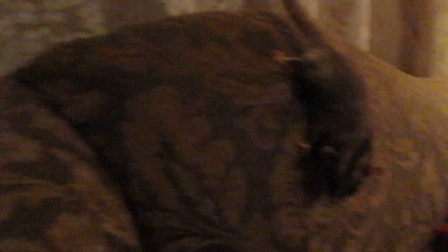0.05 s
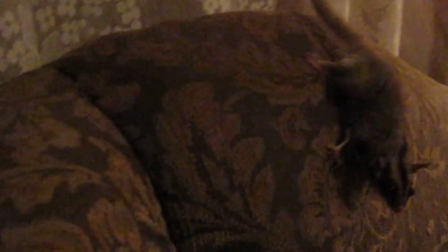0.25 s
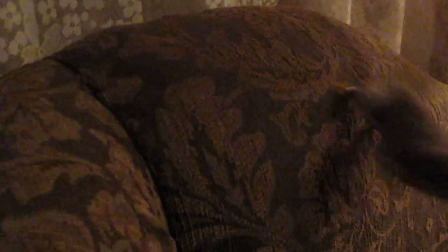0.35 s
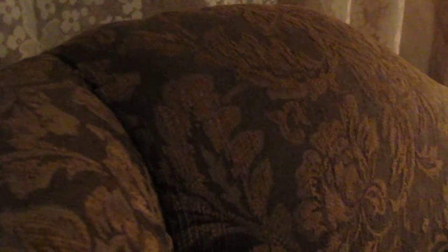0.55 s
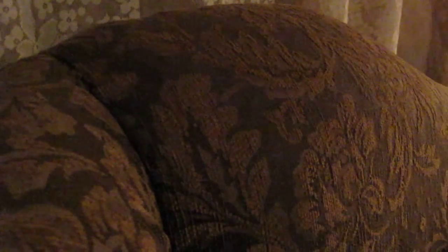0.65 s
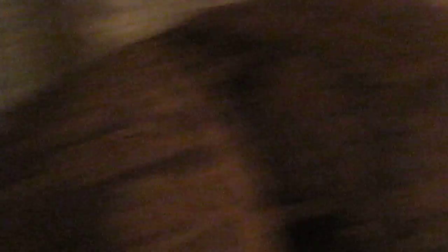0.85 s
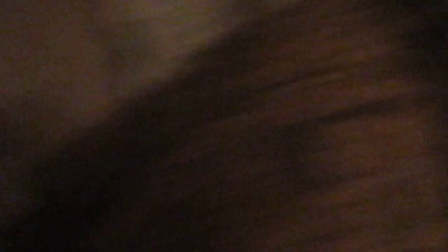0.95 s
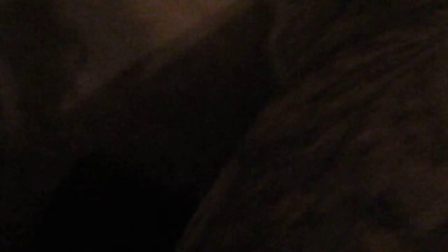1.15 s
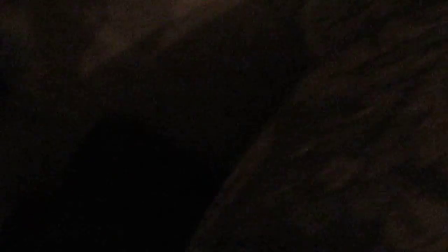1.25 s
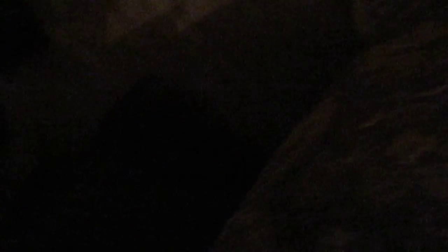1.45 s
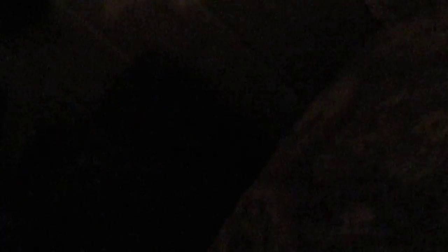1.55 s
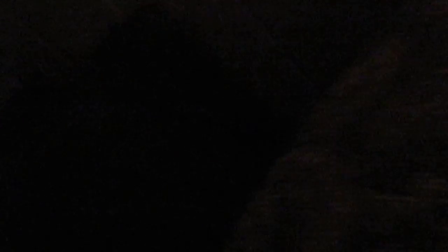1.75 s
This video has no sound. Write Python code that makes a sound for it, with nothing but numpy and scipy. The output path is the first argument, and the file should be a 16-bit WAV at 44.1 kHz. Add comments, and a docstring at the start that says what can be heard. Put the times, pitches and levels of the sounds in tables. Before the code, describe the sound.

Small claws scrabble close by on an upholstered armchair, rasping and ticking as threads snap free, growing louder until the animal leaps at about 0.75 seconds. A few soft thumps follow from 0.85 to 1 second. Light cloth swishes and one tiny squeak come between 1.1 and 1.4 seconds, then a closer, brighter rustle from 1.5 seconds. Quiet room noise and a very faint motor whine lie underneath.

```python
"""A quiet room, a hand-held camera's microphone close to an upholstered armchair; a small motor whines.
First a sugar glider scrabbles over the chair, claws rasping across the weave and snapping free of threads.
At 0.74 s it leaps off, the padding springs back, and it lands with a few soft thumps.
Then cloth swishes and squeaks as the camera turns after it; from 1.5 s the rustle is close and bright."""
import sys
import numpy as np
from scipy import signal
from scipy.fft import rfft, irfft
from scipy.io import wavfile
from scipy.ndimage import uniform_filter1d

SR = 44100
rng = np.random.default_rng(int(sys.argv[2]) if len(sys.argv) > 2 else 0)


def file_out(sig):
    """Save sig as 16-bit WAV at sys.argv[1]."""
    # one column per channel
    cols = np.atleast_2d(sig).T
    # limit, then scale
    lim = np.clip(cols, -1, 1)
    pcm = np.round(lim * 32767).astype(np.int16)
    wavfile.write(sys.argv[1], SR, pcm)


N = 79380
T = np.arange(N) / SR


def amp(db):
    """Decibels to gain."""
    return 10 ** (np.asarray(db) / 20)


def unit_rms(x):
    """Scales to unit rms."""
    return x / np.sqrt(np.mean(x ** 2) + 1e-20)


def unit_energy(x):
    """Scales to unit energy."""
    return x / np.sqrt(np.sum(x ** 2) + 1e-20)


def curve_at(points, hz):
    """Reads a table on a log-frequency axis."""
    f, value = np.transpose(points)
    return np.interp(np.log(hz + 1), np.log(f + 1), value)


def add(mix, at_s, sound):
    """Adds a sound at the given time."""
    part = mix[max(round(at_s * SR), 0):][:len(sound)]
    part += sound[:len(part)]


def convolve(x, response):
    """Convolves, keeping the length."""
    return signal.fftconvolve(x, response)[:len(x)]


def colour(x, spectrum, size=4096):
    """Minimum-phase filter of unit energy: only the spectrum's shape counts."""
    log_gain = np.log(amp(curve_at(spectrum, abs(np.fft.fftfreq(size, 1 / SR)))))
    response = np.fft.ifft(np.exp(np.conj(signal.hilbert(log_gain)))).real
    return convolve(x, unit_energy(response[:size // 2]))


def lowpass(x, hz):
    """Gentle low-pass."""
    return signal.lfilter(*signal.butter(2, min(hz, SR / 2 - 1), fs=SR), x)


def swell(peak_s, rise_s, fall_s, db):
    """Pressure of one stroke: builds up, then lets go."""
    return amp(db) * np.exp(-np.where(T < peak_s, ((T - peak_s) / rise_s) ** 2 / 2, (T - peak_s) / fall_s))


def thread_slips(per_s=4200, spread_db=4.5):
    """Tiny clicks of uneven size, one for each thread that slips."""
    size = amp(spread_db * np.minimum(rng.exponential(1, N), 4))
    return unit_rms(size * rng.choice([-1, 1], N) * (rng.random(N) < per_s / SR))


# spectrum of the room tone: f/Hz, relative level/dB
ROOM_TONE = [(25,0.5),(37,-3.5),(55,-1.5),(85,-6),(120,4.5),(200,-7),(300,1),(520,-9.5),(830,-8),(1260,-10.5),(1900,-10.5),(3200,-11.5),(4300,-13),(7500,-14),(10100,-16.5),(16000,-31.5)]
# faint narrow peaks in the background, the one near 1.9 kHz part of the motor's whine: f/Hz, half-width/Hz,
# level/dB
BACKGROUND_PEAKS = [(1370,70,-71),(1897,49,-65.5),(7120,220,-68.5)]
def room_tone(level_db=-52.5):
    """The quiet room around the microphone: steady noise with a few narrow peaks."""
    f = np.fft.rfftfreq(N, 1 / SR)
    spectrum = rfft(rng.standard_normal(N)) * amp(curve_at(ROOM_TONE, f))
    out = amp(level_db) * unit_rms(irfft(spectrum, N))
    for hz, width, db in BACKGROUND_PEAKS:
        peak = rfft(rng.standard_normal(N)) / (1 + ((f - hz) / width) ** 2)
        out += amp(db) * unit_rms(irfft(peak, N))
    return out


def motor_whine(hz=1864, level_db=-64):
    """A small motor's faint, wavering tone."""
    waver_hz = 3 * unit_rms(lowpass(rng.standard_normal(N), 20.0))
    return np.sqrt(2) * amp(level_db) * np.sin(2 * np.pi * np.cumsum(hz + waver_hz) / SR)


# reverberation of the furnished room: f/Hz, T60/s
REVERB_TIMES = [(150,0.84),(1500,0.15),(5000,0.14),(14000,0.15)]
def in_room(direct, tail_db=-16.5, early_db=-16, early_s=0.0037, early_hz=3350, move_s=0.3078):
    """The microphone hears the direct sound, dull reflections off chair and wall, then a short tail."""
    t = T[:SR // 2]
    hz, frame_s, bands = signal.stft(rng.standard_normal(len(t)) * (t > .006), SR, nperseg=256)
    decay = amp(-60 * frame_s / curve_at(REVERB_TIMES, hz)[:, None])
    tail = signal.istft(bands * decay, SR, nperseg=256)[1]
    out = direct + amp(tail_db) * convolve(direct, unit_energy(tail))
    for k in range(3):  # three patterns of reflections take turns as the animal moves
        share = np.maximum(np.cos(2 * np.pi * (T / move_s - k / 3)), 0)
        early = rng.standard_normal(len(t)) * (t > .001) * np.exp(-t / early_s)
        out += amp(early_db) * convolve(direct * share, unit_energy(lowpass(early, early_hz)))
    return out


# loudness of the rustle as the camera turns: t/s, level/dB
RUSTLE_LEVELS = [(0,-54),(.7,-47.5),(.78,-45),(.84,-52),(1.04,-48.5),(1.17,-49.5),(1.28,-57),(1.37,-50),(1.44,-55),(1.54,-52),(1.62,-48.5),(1.7,-45.5),(1.76,-43),(1.8,-43.5)]
# spectrum of rustling cloth: f/Hz, relative level/dB
RUSTLE_SPECTRUM = [(60,-21),(200,-7),(370,0.5),(800,-4),(1300,2),(1650,-0.5),(2400,-2),(4800,-7.5),(7500,-9),(10500,-8.5),(13000,-17),(16000,-31)]
def cloth_rustle(muffled_hz=2000, near_s=1.505, approach_s=0.038):
    """Rubbing cloth, muffled at first and bright once it is close to the microphone."""
    bright = colour(unit_rms(thread_slips() + rng.standard_normal(N)), RUSTLE_SPECTRUM)
    muffled = unit_rms(lowpass(bright, muffled_hz))
    near = .5 + .5 * np.tanh((T - near_s) / approach_s)
    level = amp(np.interp(T, *np.transpose(RUSTLE_LEVELS)))
    return (near * bright + (1 - near) * muffled) * level


# spectrum of the squeak: f/Hz, relative level/dB
SQUEAK_SPECTRUM = [(100,-30),(2700,-8),(3200,-10),(3850,0),(4300,-25),(6000,-22),(16000,-52)]
def cloth_squeak():
    """One small squeak: a burst of noise with a sharp peak in the treble."""
    envelope = swell(peak_s=1.224, rise_s=.003, fall_s=0.012, db=-46.5)
    return colour(rng.standard_normal(N) * envelope, SQUEAK_SPECTRUM)


# swishes during the turn: peak t/s, rise/s, fall/s, level before the low-pass/dB, cutoff f/Hz
CLOTH_SWISHES = [(1.111,0.01,0.0033,-40,4000),(1.325,0.00018,0.0021,-38.5,13000),(1.343,0.0096,0.0094,-39.5,17500),(1.359,0.006,0.0057,-33,17000),(1.386,0.014,0.0084,-36.5,11900)]
# spectrum of sliding cloth: f/Hz, relative level/dB
SWISH_SPECTRUM = [(100,-31),(1000,-39),(2400,-16),(3400,-7.5),(4800,-11.5),(6300,-2.5),(8000,-0.5),(10500,-3),(13000,-7),(16000,-14)]
def cloth_swishes(roughness=0.24, flutter_hz=400):
    """Short bright swishes that flutter as the cloth catches and slides unevenly."""
    flutter = np.exp(roughness * unit_rms(lowpass(rng.standard_normal(N), flutter_hz)))
    sliding = unit_rms(colour(flutter * rng.standard_normal(N), SWISH_SPECTRUM))
    return sum(lowpass(sliding, top_hz) * swell(*stroke) for *stroke, top_hz in CLOTH_SWISHES)


# spectrum of the armchair's padding: f/Hz, relative level/dB
PADDING_SPECTRUM = [(30,-27),(70,-7),(120,2),(210,-2.5),(330,-3),(550,-4.5),(720,-8),(1200,-33),(4000,-43)]
def padding(claws, push_db=-17):
    """The padding gives dully under the claws and springs back after the leap."""
    push = amp(push_db) * np.sqrt(abs(uniform_filter1d(claws ** 2, 900)))
    spring_back = swell(peak_s=.742, rise_s=0.012, fall_s=0.019, db=-42)
    return colour((push + spring_back) * rng.standard_normal(N), PADDING_SPECTRUM)


# modes of the struck furniture: f/Hz at pitch ratio 1, relative level/dB, decay/s
FURNITURE_MODES = [(273,-6,0.017),(350,-8.5,0.005),(430,-15.5,0.0069)]
# landing and footfalls: t/s, level/dB, decay/s, cutoff f/Hz, pitch ratio, relative ring level/dB
FOOTFALLS = [(0.8629,-33,0.0048,2460,1.2,-2),(.878,-28.5,0.0037,700,1.18,7),(.892,-33.5,0.0079,500,1.02,12),(0.9113,-23,0.0035,560,.53,0),(.919,-32,0.0033,1500,1,-2),(0.9864,-16.5,0.00088,1100,1.4,-1),(1.017,-34.5,0.0071,1720,1.2,-2)]
def landing_thumps(low_hz=125, slope=2.1, rise_s=0.00075, push=0.69):
    """Soft blows: a low push, a scuff and a brief ring pitched by where the furniture is struck."""
    out, t, hz = np.zeros(N), T[:4096], np.geomspace(20, 20000, 40)
    for at_s, db, decay_s, top_hz, pitch, ring_db in FOOTFALLS:
        ring = sum(amp(mode_db) * unit_energy(np.sin(2 * np.pi * f * pitch * t) * np.exp(-t / fade_s))
                   for f, mode_db, fade_s in FURNITURE_MODES)
        band_db = -10 * np.log10((1 + (low_hz / hz) ** 6) * (1 + (hz / top_hz) ** 2) ** slope)
        envelope = (1 - np.exp(-t / rise_s)) * np.exp(-t / decay_s)
        scuff = unit_energy(envelope * rng.standard_normal(len(t)))
        blow = unit_energy(colour(scuff + push * (t == 0), np.c_[hz, band_db]))
        add(out, at_s, amp(db) * np.linalg.norm(envelope) * unit_energy(blow + amp(ring_db) * ring))
    return out


# claw strokes over the weave: peak t/s, rise/s, fall/s, level/dB
CLAW_STROKES = [(.144,0.032,0.0063,-43),(.2,0.042,0.027,-47.5),(0.247,0.02,0.011,-39),(.305,0.023,0.018,-38.5),(.366,0.02,0.021,-33.5),(0.397,0.0064,0.0085,-31),(0.421,0.0072,0.0027,-29),(0.467,0.011,0.032,-33),(0.54,0.0024,0.0032,-26),(0.572,0.0086,0.01,-27),(0.605,0.0099,0.0096,-23.5),(0.647,0.015,0.012,-24.5),(0.726,0.0077,0.021,-29)]
# spectrum of one thread slipping: f/Hz, relative level/dB
SLIP_SPECTRUM = [(50,-33),(130,-11),(420,-12),(570,-1),(770,-5),(1170,2.5),(1650,1.5),(2400,.5),(3100,-5),(3750,-0.5),(4800,-9.5),(7000,-10),(9700,-13),(12000,-21.5),(16000,-35)]
def claw_rasp(sheen_db=-34, sheen_hz=(6400, 10900)):
    """Claws drag across the weave at close range; fine fibres sizzle even under a light touch."""
    pressure = sum(swell(*stroke) for stroke in CLAW_STROKES)
    # all-pass: the cloth smears each slip a little
    smeared = signal.lfilter([.6, -1.2, 1], [1, -1.2, .6], thread_slips() * pressure)
    sheen = unit_rms(signal.lfilter(*signal.butter(2, sheen_hz, "band", fs=SR), thread_slips()))
    return colour(smeared, SLIP_SPECTRUM) + amp(sheen_db) * np.sqrt(pressure) * sheen


# claws snapping free: t/s, relative level/dB, cloth f/Hz before tuning, relative tick level/dB
THREAD_SNAPS = [(0.1447,-20,2220,2),(0.2378,-23,1880,-5),(.2414,-19,1970,0.5),(.2676,-18,2000,-4),(0.2884,-14.5,1820,-3.5),(0.292,-17.5,2320,26),(0.328,-24,2000,1),(0.368,-20.5,2650,9),(0.3993,-15.5,2190,-5),(0.4068,-12.5,1870,-1.5),(0.4138,-13.5,1780,-7),(0.4153,-17,1600,-26),(0.421,-7.5,2370,-4),(.425,-10,2200,-8),(0.4265,-14.5,1620,-18),(.429,-10.5,2180,-6),(0.4484,-20,2040,15),(0.5133,-20,2400,4),(.52,-4.5,2180,-6),(0.5298,-8.5,1900,-7.5),(0.5314,-22,1940,-9),(.538,-13,2000,-15),(0.5552,-7,1990,-9.5),(0.5618,-17,2500,-2),(0.5765,-9,2100,-27),(0.5865,-6.5,1970,-15),(0.6061,-14,1830,-10),(0.61,-9,1930,-27),(0.6113,-17,1910,-32),(0.6233,-4.5,2000,-10),(0.6338,-6,2000,1.5),(0.6451,-8,2340,-28),(0.6507,-18,1600,-4),(0.675,-23.5,2430,-18),(0.6955,-19,2130,-11),(0.7069,-4,2180,-6.5),(0.7188,-6.5,2350,-9.5),(0.7207,-6,2000,-14.5),(0.7259,-7.5,1710,-14),(0.7402,-24,1380,3),(0.7501,-12.5,1640,-16)]
# spectrum of the claw tip's tick: f/Hz, relative level/dB
TICK_SPECTRUM = [(100,-14),(1500,-1),(3700,3),(4900,-2),(7500,1),(9700,-2.5),(12000,-18.5),(16000,-28)]
def claw_snaps(tuning=0.93, slide_s=0.00018, decay_s=0.00021, fray_s=0.00079, tick_db=2, trim_db=-0.57):
    """Close to the microphone, each freed thread plucks the taut cloth; the tip ticks and fibres fray."""
    out, t = np.zeros(N), T[:1024]
    envelope = (1 - np.exp(-t / slide_s)) * np.exp(-t / decay_s)
    low_cut = signal.butter(2, 930, "high", fs=SR)  # a small patch of cloth radiates little bass
    for at_s, db, hz, treble_db in THREAD_SNAPS:
        pluck = unit_energy(signal.lfilter(*low_cut, envelope * np.sin(2 * np.pi * hz * tuning * t)))
        slide_noise, fray_noise = rng.standard_normal((2, len(t)))
        scrape = unit_energy(slide_noise * t * np.exp(-t / slide_s))
        crackle = unit_energy(fray_noise ** 3 * np.exp(-t / fray_s))
        tick = unit_energy(colour((t == 0) + amp(-1) * (scrape + crackle), TICK_SPECTRUM))
        snap = unit_energy(pluck + amp(treble_db + tick_db) * tick)
        add(out, at_s, np.sqrt(8) * amp(db + trim_db) * snap)
    return out


def scene():
    """At the microphone, in mono: the glider in the room, moving cloth and the steady background."""
    claws = claw_snaps() + claw_rasp()
    glider = in_room(claws + padding(claws) + landing_thumps())
    cloth = cloth_swishes() + cloth_squeak() + cloth_rustle()
    return (glider + cloth + room_tone() + motor_whine())[None]


def record(dry):
    """The camera takes in sound up to 15.9 kHz."""
    band_limit = signal.firwin(511, 15900, window=("kaiser", 9), fs=SR)
    return signal.oaconvolve(dry, band_limit[None], "same")


dry = scene()
out = record(dry)
file_out(out)
```